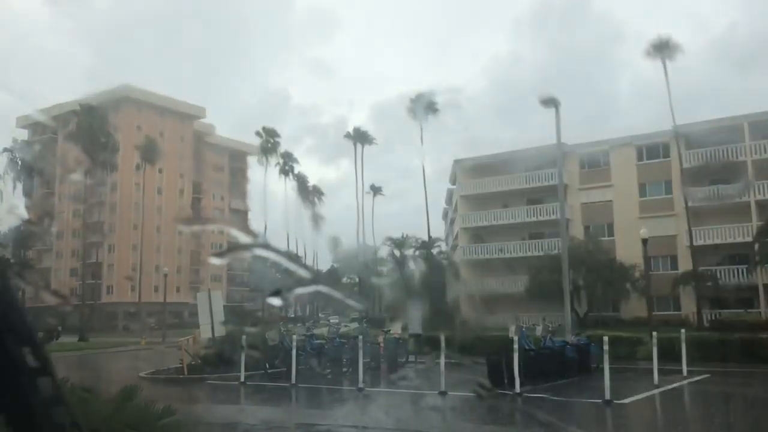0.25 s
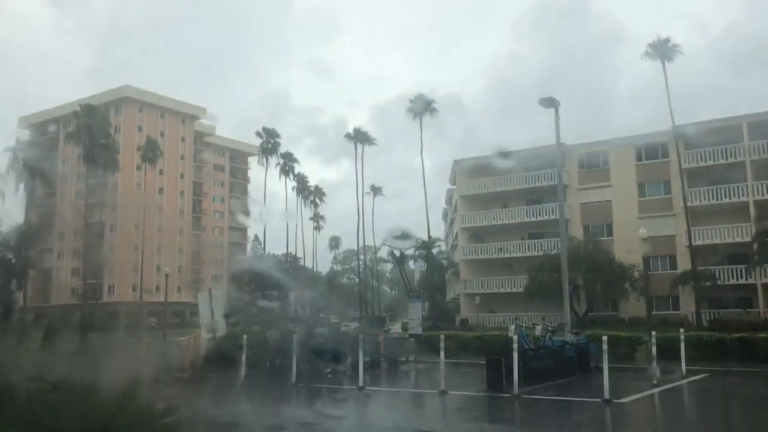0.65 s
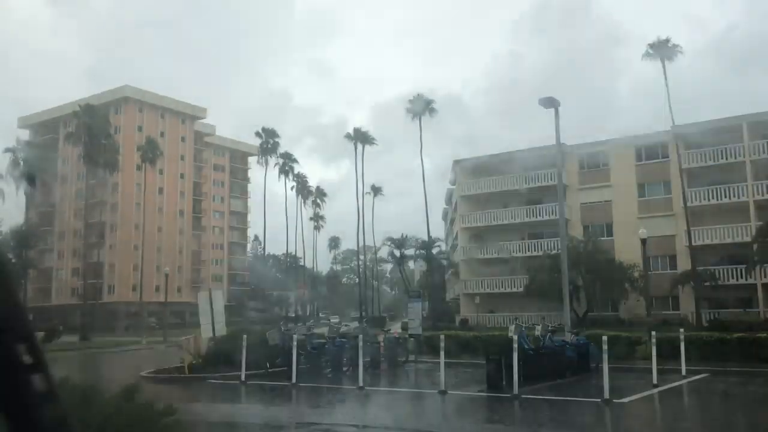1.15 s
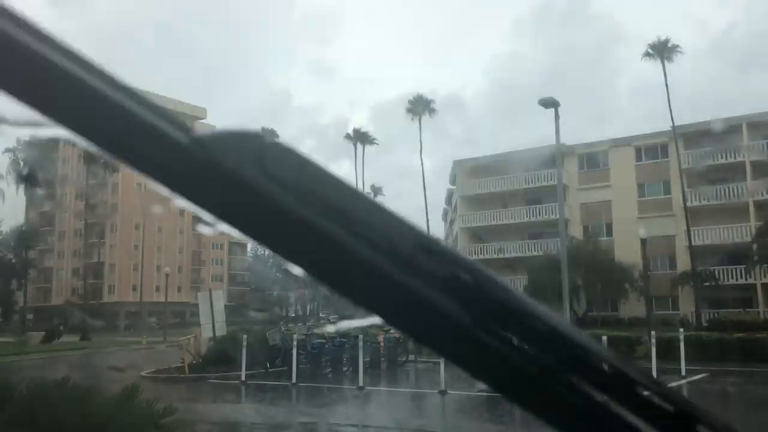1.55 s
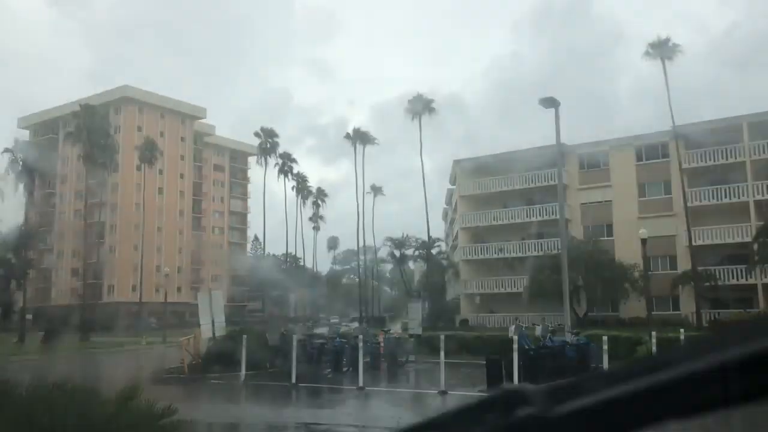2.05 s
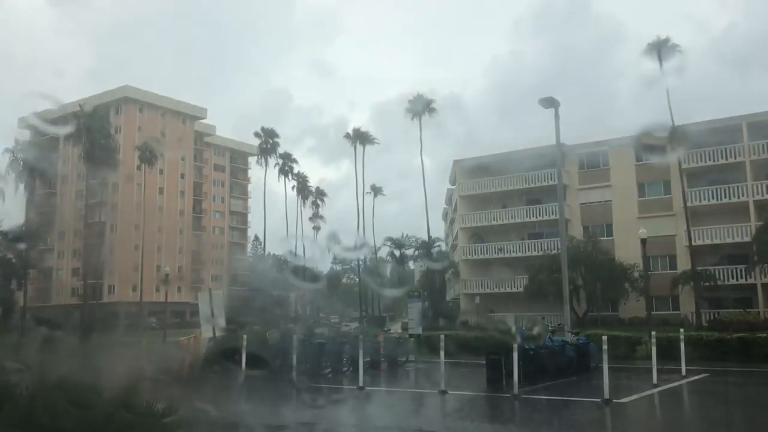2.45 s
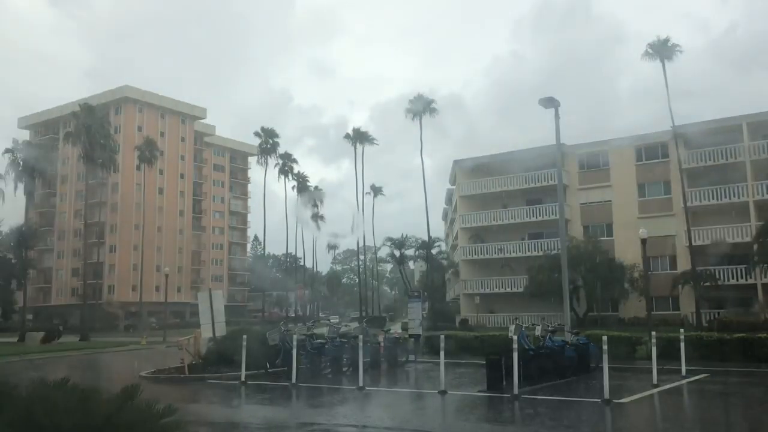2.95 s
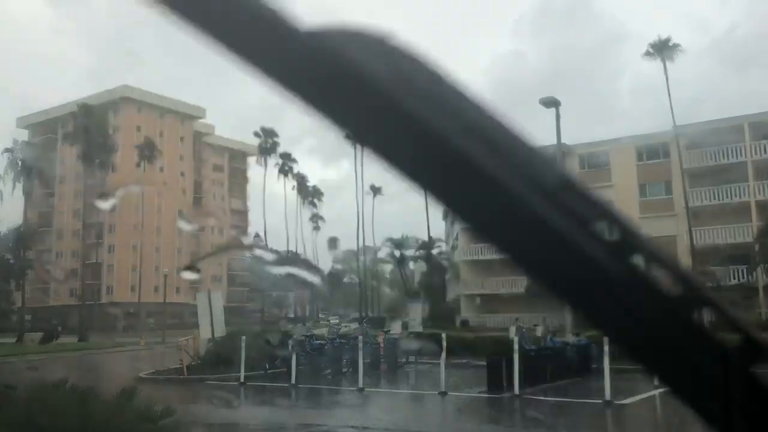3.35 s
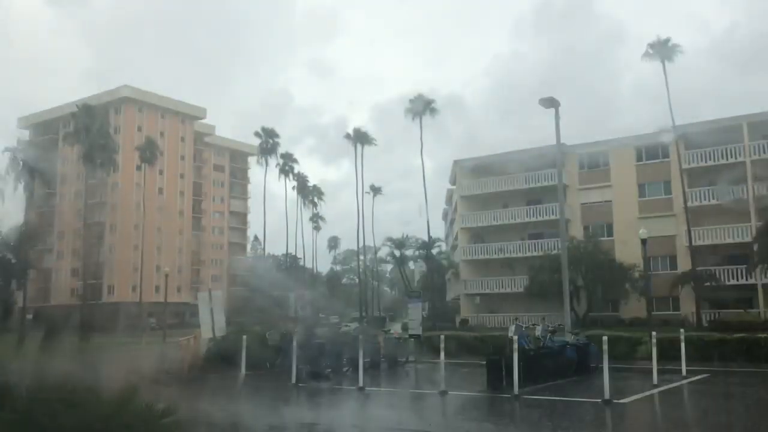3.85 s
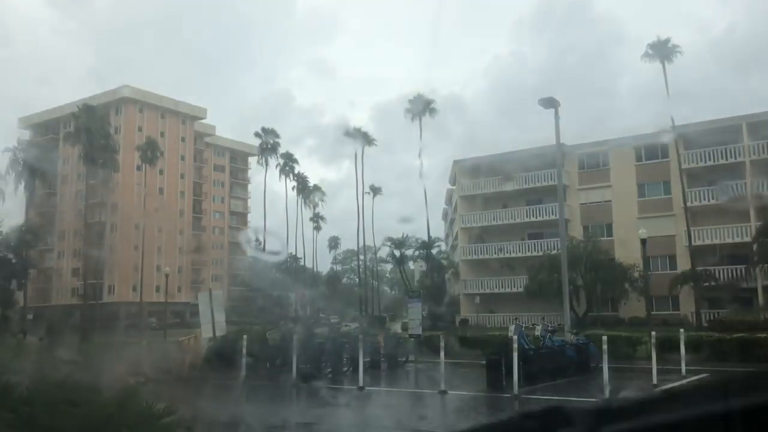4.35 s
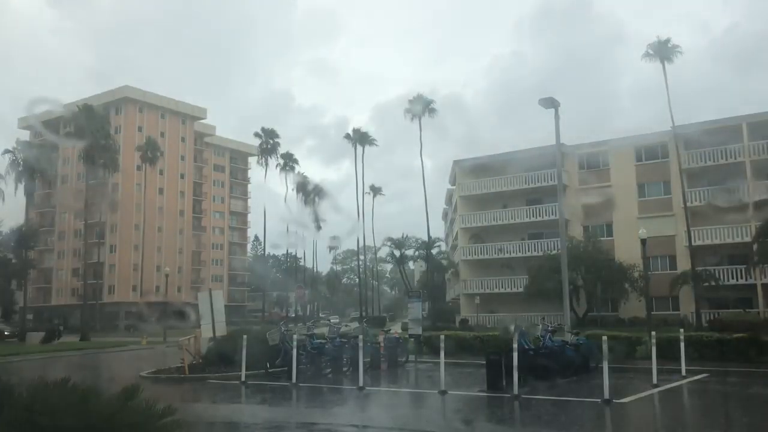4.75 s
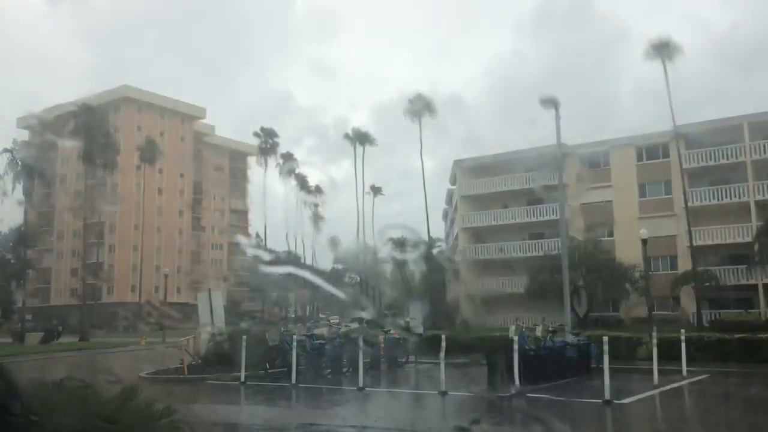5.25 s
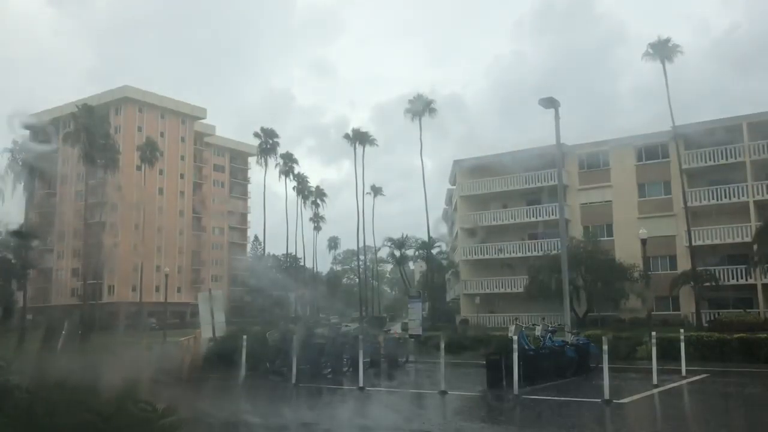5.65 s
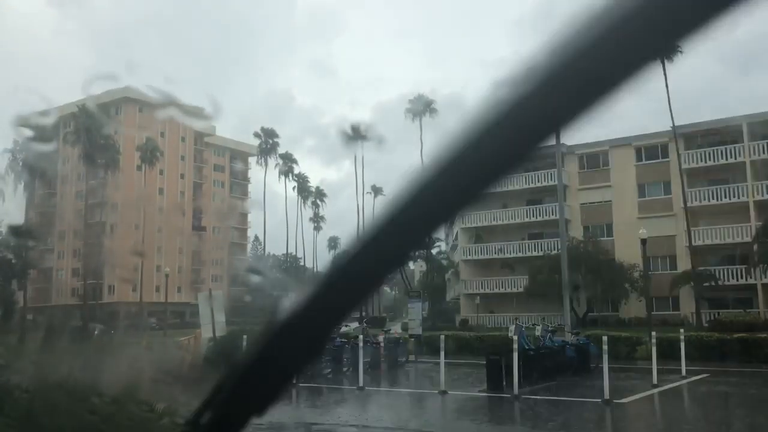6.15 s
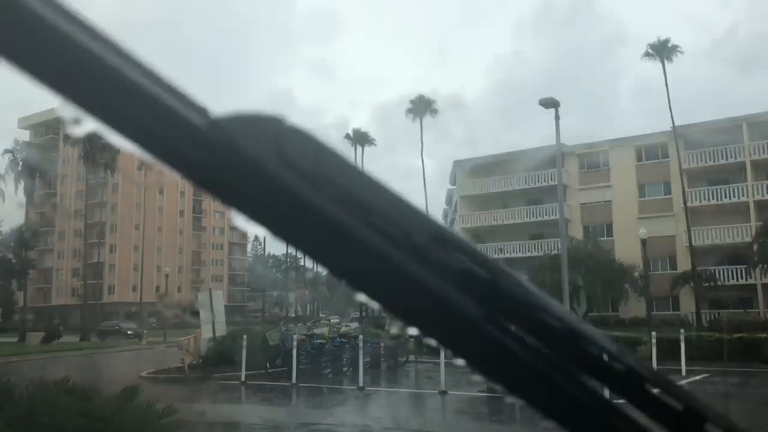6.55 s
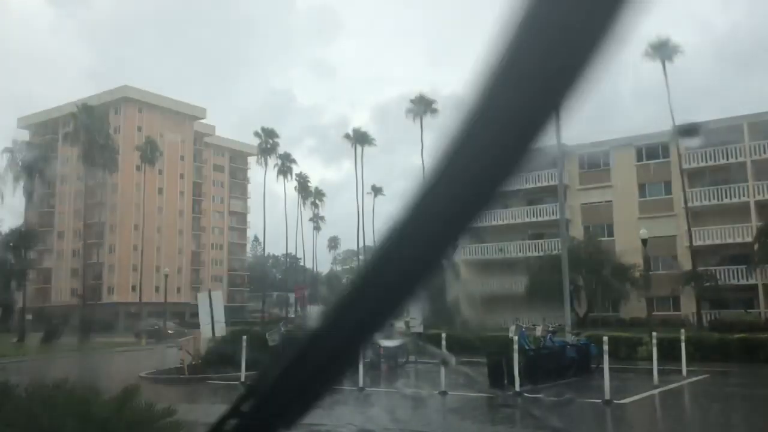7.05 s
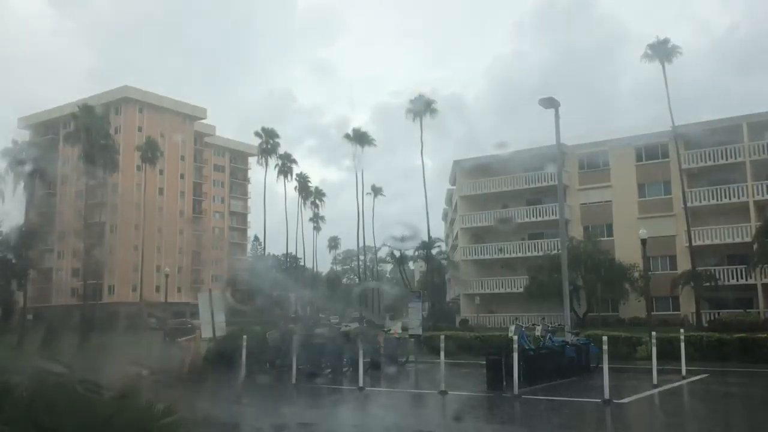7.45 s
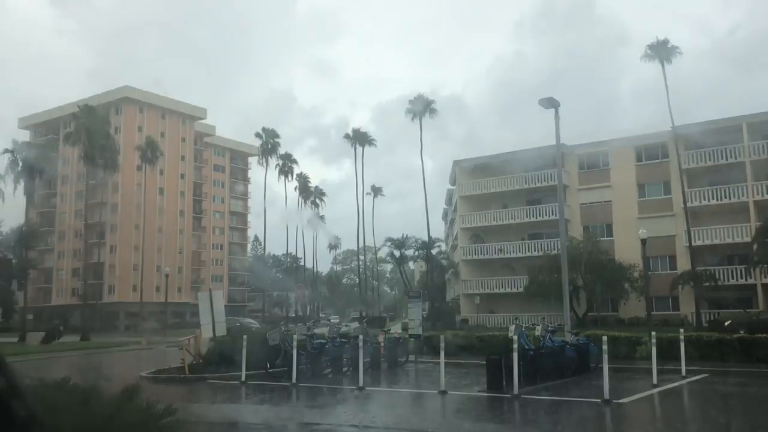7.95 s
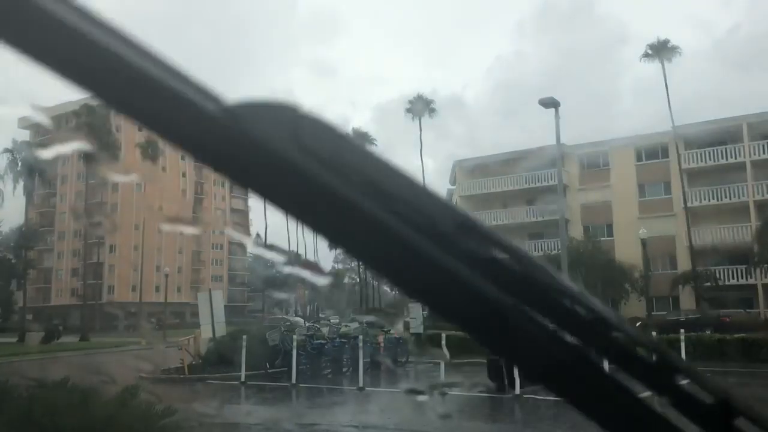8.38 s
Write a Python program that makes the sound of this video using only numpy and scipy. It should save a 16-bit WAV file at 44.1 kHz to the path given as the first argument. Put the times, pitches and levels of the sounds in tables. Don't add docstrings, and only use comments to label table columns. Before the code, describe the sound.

Heard from the dashboard of a closed car, rain makes a continuous crisp wash of ticks and splats on the glass with a duller drumming on the roof. From the start, wiper blades thump deeply at one end of their sweep, rub low over wet glass, knock more softly at the other end and slide back, repeating regularly. Scattered heavy drops and bright splashes stand out close by.

```python
import sys
import numpy as np
from scipy import signal
from scipy.io import wavfile
from scipy.ndimage import uniform_filter1d

SR = 44100
rng = np.random.default_rng(int(sys.argv[2]) if len(sys.argv) > 2 else 0)


def convert_level_to_amplitude(level_db):
    exponent = np.asarray(level_db, float) / 20
    return 10 ** exponent


def store_pcm(level_fs):
    pcm = np.round(np.clip(level_fs, -1, 1) * 32767).astype(np.int16)
    wavfile.write(sys.argv[1], SR, np.atleast_2d(pcm).T)


N = 424241


def evened(x):
    return x / np.sqrt(np.mean(x ** 2) + 1e-20)


def add(mix, s, sound):
    part = mix[max(round(s * SR), 0):][:len(sound)]
    part += sound[:len(part)]


def coloured(x, points):
    f, db = np.transpose(points)
    hz = abs(np.fft.fftfreq(8192, 1 / SR))
    curve_db = np.interp(np.log(hz + 1), np.log(f + 1), db)
    log_gain = np.log(convert_level_to_amplitude(np.maximum(curve_db, -100)))
    taps = np.fft.ifft(np.exp(np.conj(signal.hilbert(log_gain)))).real[:4096]
    return signal.oaconvolve(x, taps)[:len(x)]


def drift(seconds):
    size = max(int(seconds * SR), 1)
    smooth = uniform_filter1d(rng.standard_normal(N), size)
    return evened(uniform_filter1d(smooth, size))


def hiss():
    steady = evened(coloured(rng.standard_normal(N), [(3000, -23), (7000, -3.0), (11000, -10.0), (16000, -3)]))
    whine = np.sin(2 * np.pi * 15729 * np.arange(N) / SR)
    return convert_level_to_amplitude(-80) * steady + convert_level_to_amplitude(-96) * whine


# (frequency [Hz], level [dB per Hz])
TICK_TONE = [(1000, -18), (2500, 0.), (7000, -6.), (12000, -14.), (16000, -20.)]


def ticks():
    per_s, spread_db = 50, 4.5
    hits = rng.random(N) < per_s / SR
    clicks = convert_level_to_amplitude(spread_db * np.minimum(rng.exponential(1, N), 4.)) * hits
    clicks = clicks * rng.choice([-1., 1.], N)
    echo = convert_level_to_amplitude(-6.) * np.roll(clicks, 30)
    return convert_level_to_amplitude(-66.) * evened(coloured(clicks - echo, TICK_TONE))


def patter(per_s, spread_db, t60, wet_db, tail, largest):
    hits = rng.random(N) < per_s / SR
    size = convert_level_to_amplitude(spread_db * np.minimum(rng.exponential(1, N), largest)) * hits
    t = np.arange(SR // 10) / SR
    rise = (1 - np.exp(-t / (0.072 * t60))) ** 2
    power = rise * (convert_level_to_amplitude(-60 * t / t60) ** 2 + convert_level_to_amplitude(wet_db - 60 * t / tail) ** 2)
    strength = np.sqrt(abs(signal.oaconvolve(size ** 2, power)[:N]))
    return evened(strength * rng.standard_normal(N))


# (time [s], level [dB])
RAIN_LEVEL = [(0, -48.5), (.95, -49.5), (1.3, -48), (2., -50), (2.9, -49), (3.1, -50.5), (3.5, -49),
              (3.75, -50), (4.6, -48), (4.8, -50), (5., -48), (6., -49), (7.05, -49.5), (7.4, -48.5),
              (8.1, -48), (8.5, -49), (8.9, -48.5), (9.62, -49)]
# (frequency [Hz], level [dB per Hz])
ROOF_TONE = [(15, -35), (25, -18), (43, -12), (70, -14), (148, -1), (182, 3.5), (232, 0.5), (280, -3.5),
             (310, -2.5), (476, -5.5), (575, -5.5), (730, -6), (838, -5), (1290, -11), (1500, -34.5),
             (1950, -26), (3300, -120)]
# (frequency [Hz], level [dB per Hz])
GLASS_TONE = [(710, -34.5), (1200, -5), (1280, -1.5), (1400, -3.5), (1930, -5), (2450, -4.5), (3010, -6.5),
              (3590, -4.5), (12900, -30.5), (15200, -34), (16000, -28)]


def rain():
    near = patter(per_s=260, spread_db=3.2, t60=.009, wet_db=-17, tail=0.035, largest=3.5)
    far = convert_level_to_amplitude(1.32 * drift(0.0032)) * rng.standard_normal(N)
    high = signal.butter(2, 7000, "high", fs=SR, output="sos")
    spray = patter(per_s=97, spread_db=1.0, t60=0.0045, wet_db=-16, tail=0.023, largest=5.4)
    spray = signal.sosfilt(high, spray)
    glass = evened(coloured(far + convert_level_to_amplitude(-3) * near + convert_level_to_amplitude(-1.0) * spray, GLASS_TONE))
    roof = evened(coloured(rng.standard_normal(N) + convert_level_to_amplitude(-3) * near, ROOF_TONE))
    rain_db = np.interp(np.arange(N) / SR, *np.transpose(RAIN_LEVEL))
    swell_db = 0.14 * (rain_db - rain_db.mean())
    glass_db = rain_db + 1.5 + .7 * drift(.03)
    roof_db = rain_db + swell_db + 5 + 1. * drift(.03)
    return convert_level_to_amplitude(glass_db) * glass + convert_level_to_amplitude(roof_db) * roof


# (frequency [Hz], width [Hz], level [dB])
PANEL_RINGS = [(630, 25, -8), (834, 79, -8), (998, 40, -9), (1068, 73, -9), (1246, 33, -9), (3590, 43, -18),
               (3920, 150, -19.5)]


def panels(x):
    out = x.copy()
    for hz, width, db in PANEL_RINGS:
        out += convert_level_to_amplitude(db) * signal.lfilter(*signal.iirpeak(hz, hz / width, SR), x)
    return out


STRAY_COUNT, STRAY_SPREAD_DB = 25, 1.5


def stray_drops():
    when, pitch = rng.random((2, STRAY_COUNT))
    size, depth = STRAY_SPREAD_DB * rng.standard_normal((2, STRAY_COUNT))
    low_hz, high_hz = 1600, 3900
    hz = low_hz * (high_hz / low_hz) ** pitch
    return list(zip(when * N / SR, -33.5 + size, hz, -49 + 2 * depth))


# (time [s], peak level [dB], ring frequency [Hz], roof thud level [dB])
LARGEST_DROPS = [(0.2937, -31, 3450, -34), (0.416, -26.5, 1730, -49), (0.4854, -28, 1590, -36),
                 (1.286, -25.5, 1970, -41), (1.473, -27, 2610, -46), (2.1306, -29, 3900, -35),
                 (2.4247, -25, 2940, -39), (2.7033, -28, 3280, -36), (2.8858, -28, 2390, -36),
                 (2.9033, -28, 2400, -44), (3.168, -27.5, 2080, -42), (3.6456, -28.5, 2460, -49),
                 (3.8107, -23.5, 1940, -41), (3.9033, -24, 2690, -40), (4.7152, -29, 3930, -39),
                 (4.9723, -29, 1700, -39), (5.7084, -29, 3540, -43), (5.9883, -29, 3920, -39),
                 (6.1075, -29, 3850, -26), (6.3066, -31, 3330, -45), (6.8552, -27.5, 2660, -27),
                 (7.2145, -25, 2520, -41), (7.3336, -29, 3840, -41), (7.8326, -36, 3530, -29),
                 (8.8256, -25, 1510, -24), (8.9351, -26.5, 2370, -43), (9.179, -24, 2320, -31),
                 (9.2808, -27, 2780, -40), (9.421, -28, 2400, -46), (9.5127, -28, 1710, -42)]


def big_drops():
    out, t = np.zeros(N), np.arange(1500) / SR
    spread = (1 - np.exp(-t / .0013)) ** 2
    for s, db, hz, thud_db in LARGEST_DROPS + stray_drops():
        noise = rng.standard_normal(len(t))
        tone = [(hz * .2, -35), (hz * .55, -6), (hz, 0.), (hz * 1.6, -5), (hz * 2.6, -18), (hz * 5.5, -40)]
        fade = convert_level_to_amplitude(db - 10.5 - 60 * t / 0.018) + convert_level_to_amplitude(db - 20.5 - 60 * t / .06)
        add(out, s - .001, spread * fade * evened(coloured(noise, tone)))
        thud = coloured(noise, [(250, -34), (600, -0.5), (1200, -7.0), (1600, -13), (4000, -47)])
        add(out, s - .002, spread * convert_level_to_amplitude(thud_db - 9 - 60 * t / 0.081) * evened(thud))
    return out


def stray_splashes():
    when = rng.random(STRAY_COUNT) * N / SR
    return list(zip(when, -42 + STRAY_SPREAD_DB * rng.standard_normal(STRAY_COUNT)))


# (time [s], peak level [dB])
NEAR_SPLASHES = [(.2563, -49), (.621, -41), (1.2855, -37), (1.4626, -37), (1.5174, -38), (2.0064, -38),
                 (2.4249, -37), (2.7033, -40), (3.1688, -41), (3.5808, -42), (3.6028, -45), (3.9579, -36),
                 (4.1824, -44), (4.5795, -44), (4.6349, -38), (4.7147, -39), (5.773, -41), (5.9778, -47),
                 (5.9878, -41), (6.107, -39), (6.1315, -37), (7.1721, -39), (7.3986, -34), (7.518, -43),
                 (7.5258, -37), (8.3823, -38), (8.5021, -40), (8.8662, -38), (8.8917, -38), (9.0229, -40)]


def splashes():
    out, t = np.zeros(N), np.arange(1500) / SR
    bright = [(1500, -30), (4000, 0), (7000, -2.0), (10000, -6), (14000, -13.)]
    for s, db in NEAR_SPLASHES + stray_splashes():
        fade = convert_level_to_amplitude(db - 11.0 - 60 * t / 0.012) + convert_level_to_amplitude(db - 19.0 - 60 * t / .06)
        add(out, s, fade * evened(coloured(rng.standard_normal(len(t)), bright)))
    return out


# (time [s], level [dB])
DRAG_LEVEL = [(0., -34), (.15, -46), (.3, -53), (.4, -60), (.65, -53), (.75, -42), (.85, -37), (1.1, -45.5),
              (1.35, -45.5), (1.45, -50), (1.52, -39), (1.58, -39.5), (1.686, -42)]
# (frequency [Hz], level [dB per Hz])
DRAG_TONE = [(15, -44), (25, -40), (40, -19), (114, -1.5), (145, -4), (178, -9), (209, -1.5), (248, -22.5),
             (291, -9.5), (320, -18.5), (420, -46), (700, -120)]


def rubber():
    cycle_s = 1.686
    phase = (np.arange(N) / SR - LOW_END_BLOWS[0][0]) % cycle_s
    rumble = evened(coloured(rng.standard_normal(N), DRAG_TONE))
    rumble = evened(rumble / (uniform_filter1d(rumble ** 2, 2000) + .1) ** .35)
    return convert_level_to_amplitude(np.interp(phase, *np.transpose(DRAG_LEVEL)) + 2.0 * drift(.03)) * rumble


def ring(hz, rise, t60):
    t = np.arange(int(SR * (rise + t60))) / SR
    swell = np.sin(np.pi / 2 * np.minimum(t / rise, 1)) ** 2
    fade = convert_level_to_amplitude(-60 * np.maximum(t - rise, 0) / t60)
    return -swell * fade * np.sin(2 * np.pi * hz * t)


def knocks(blows, modes, loose):
    out = np.zeros(N)
    for s, db in blows:
        for delay, hz, mode_db, rise, t60 in modes:
            late, sharp, strong = loose * rng.standard_normal(3)
            level = convert_level_to_amplitude(db + mode_db + 1.9 * strong)
            add(out, s + delay + 0.0021 * late, level * ring(hz * (1 + 0.018 * sharp), rise, t60))
    return out


# (time [s], level [dB])
LOW_FLIP_BLOWS = [(1.602, -22.5), (3.288, -20.5), (4.971, -24.5), (6.66, -22), (8.35, -21.5)]
# (time [s], level [dB])
HIGH_FLIP_BLOWS = [(0.779, -29.5), (2.457, -28), (4.145, -28.5), (5.829, -29.5), (7.516, -28.5),
                   (9.199, -30)]
# (time [s], level [dB])
SLACK_BLOWS = [(1.007, -34), (2.689, -33), (4.379, -30), (6.063, -29), (7.75, -29.5), (9.436, -29)]
# (delay [s], frequency [Hz], peak level [dB], rise [s], 60 dB fade [s])
LOW_FLIP_MODES = [(-.002, 215, -8, 0.0034, 0.25), (-.002, 342, -14.5, 0.003, 0.14),
                  (-.002, 516, -15.5, 0.004, 0.026), (-.002, 783, -11.5, 0.0031, 0.026),
                  (.012, 192, 1, 0.012, 0.065), (.014, 274, -13, .008, 0.053),
                  (0.011, 410, -14, 0.0067, 0.051), (0.023, 119.7, -9.5, 0.014, 0.1),
                  (.025, 78.1, -13, 0.021, 0.082), (0.048, 199, -18.5, 0.0077, 0.12)]
HIGH_FLIP_MODES = [(0., 224, 1, 0.0074, 0.079), (0., 356, -1.5, 0.0015, 0.03),
                   (.008, 172.4, 0, 0.017, 0.045), (.01, 100, -9.5, 0.0081, 0.18), (.01, 75, -7.5, .02, .2),
                   (.035, 199.6, -6, 0.0084, 0.12)]
SLACK_MODES = [(-.045, 198, -7.5, 0.0095, 0.18), (-.04, 121, -16, 0.031, 0.12),
               (0., 192.4, 3.5, 0.0072, 0.07), (.005, 113, -0.5, 0.0094, 0.12),
               (.022, 200, -2.5, .006, .09), (.055, 302, -13, 0.0063, .08)]


def flips():
    low = knocks(LOW_FLIP_BLOWS, LOW_FLIP_MODES, loose=0.525)
    high = knocks(HIGH_FLIP_BLOWS, HIGH_FLIP_MODES, loose=0.29)
    return low + high + knocks(SLACK_BLOWS, SLACK_MODES, loose=0.28)


# (time [s], level [dB])
LOW_END_BLOWS = [(.0529, 1), (1.7387, -0.5), (3.4246, 1.5), (5.11, 2), (6.7952, 1.5), (8.4832, 1)]
# (time [s], level [dB])
HIGH_END_BLOWS = [(.8735, 0.1), (2.5596, 0.11), (4.2454, 0.1), (5.9306, 0.1), (7.6174, 0.1), (9.3047, 0.1)]
# (delay [s], frequency [Hz], peak level [dB], rise [s], 60
# dB fade [s])
LOW_END_MODES = [(-.025, 170, -29, 0.014, 0.06), (-.005, 215, -14, 0.015, 0.016),
                 (0., 280, -28.5, 0.0082, 0.042), (-.002, 340, -35, 0.0044, 0.056),
                 (-.002, 430, -42, 0.0063, 0.056), (-.003, 550, -39.5, 0.0055, 0.02),
                 (-.005, 750, -39, .007, .05), (.009, 140, -19, 0.0034, 0.079),
                 (0.0084, 108.6, -26, 0.012, 0.14), (0.0193, 78, -41, 0.033, 0.27),
                 (0.0197, 53, -44, 0.051, 0.96), (0.028, 206.5, -34.5, 0.023, 0.13),
                 (.03, 166, -33, 0.011, 0.21), (0.036, 283, -42, 0.0046, 0.055),
                 (0.062, 147.6, -35, 0.017, 0.13),
    (.14, 45, -53, 0.045, .4),
    (0.238, 131, -37, .03, 0.17),
]
# (delay [s], frequency [Hz], peak level [dB], rise [s], 60 dB fade [s])
HIGH_END_MODES = [(-.03, 185.6, -22.5, 0.039, 0.12), (-.015, 302, -27, 0.0032, 0.017),
                  (-.013, 453, -35, 0.0026, 0.076), (-.013, 600, -35.5, 0.0021, .04),
                  (-.012, 810, -47, 0.003, 0.11), (0., 236, -27.5, 0.0079, 0.034),
                  (-.003, 117.2, -20.5, 0.029, 0.2), (0.013, 91.9, -27.5, 0.011, 0.19),
                  (0.019, 61.9, -37.5, 0.0067, 0.42), (.035, 119, -29, 0.011, .1),
                  (.3, 58, -46, 0.024, 0.44), (.4, 121.5, -36, 0.029, 0.67),
                  (0.498, 159, -34.5, 0.016, 0.044)]


def end_knocks():
    low = knocks(LOW_END_BLOWS, LOW_END_MODES, loose=.06)
    return low + knocks(HIGH_END_BLOWS, HIGH_END_MODES, loose=.06)


def scene():
    weather = hiss() + ticks() + convert_level_to_amplitude(-0.65) * panels(rain()) + big_drops() + splashes()
    wipers = rubber() + flips() + end_knocks()
    return (weather + wipers)[None]


def low_pass(x):
    return signal.sosfilt(signal.butter(12, 16250, fs=SR, output="sos"), x)


def record(dry):
    x = signal.sosfilt(signal.butter(2, 36, "high", fs=SR, output="sos"), dry)
    treble_edge = signal.firwin(2047, 15780, window=("kaiser", 9), fs=SR)
    x = signal.oaconvolve(x, treble_edge[None], "same")
    return low_pass(x)


dry = scene()
out = record(dry)
store_pcm(out)
```